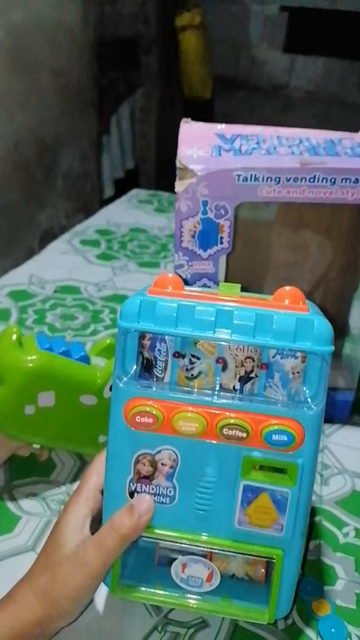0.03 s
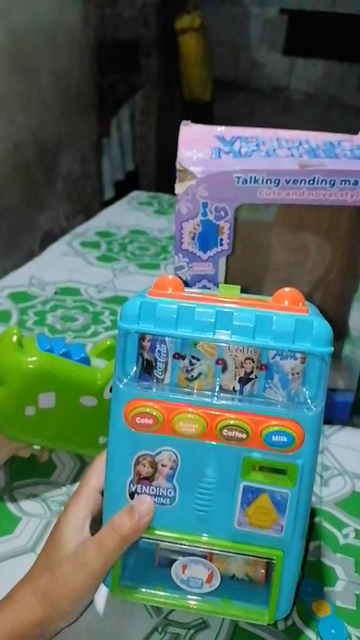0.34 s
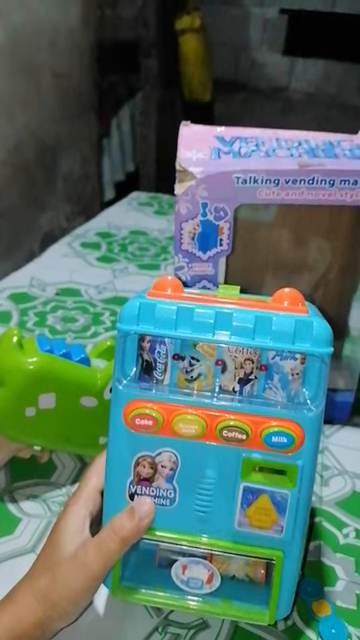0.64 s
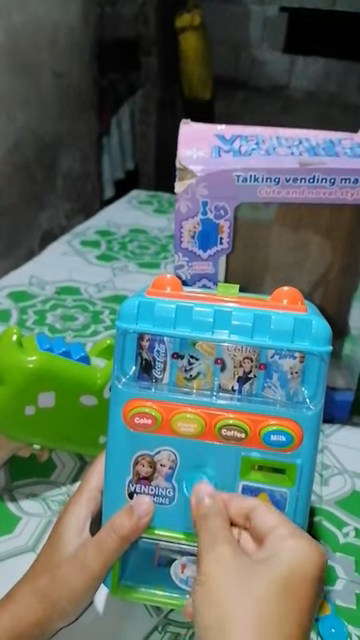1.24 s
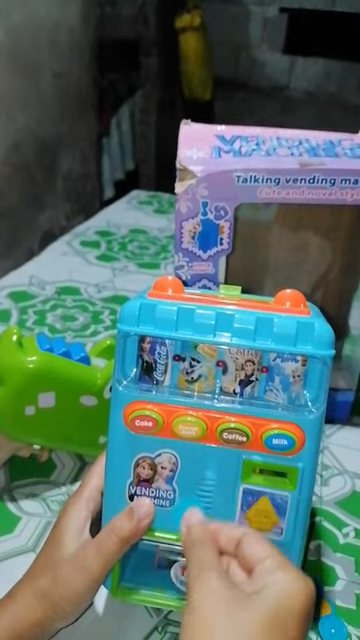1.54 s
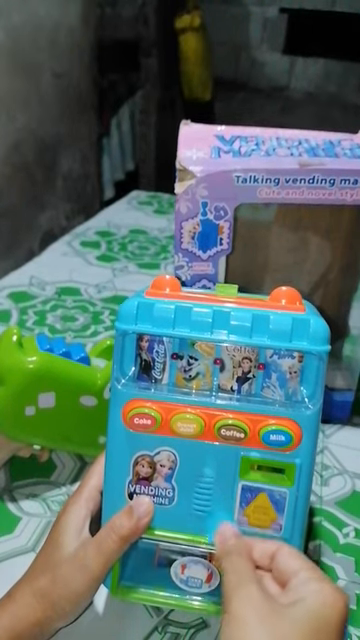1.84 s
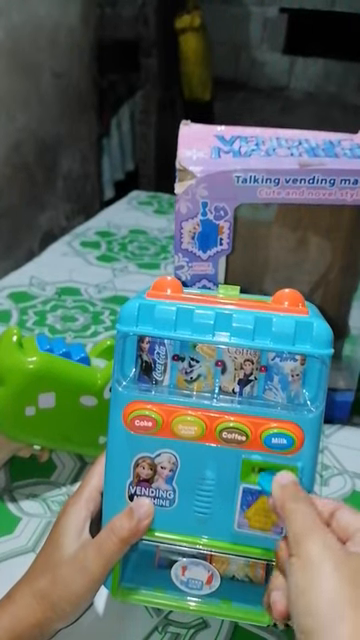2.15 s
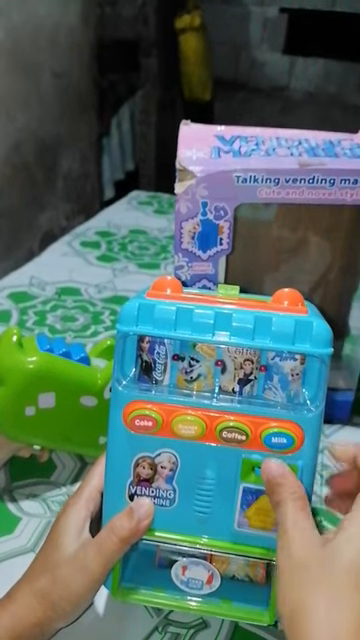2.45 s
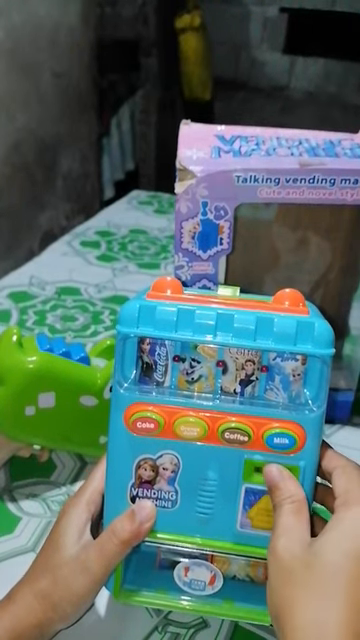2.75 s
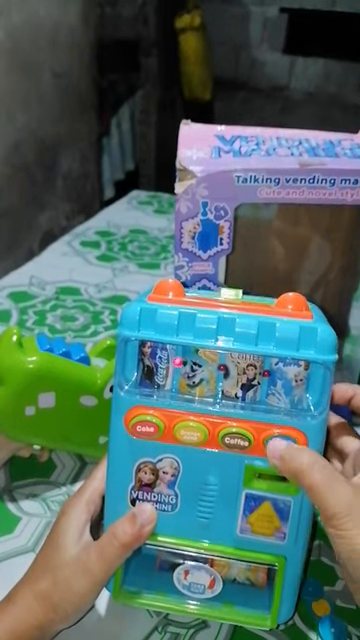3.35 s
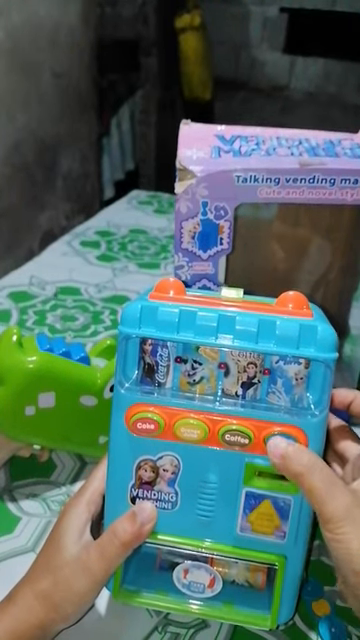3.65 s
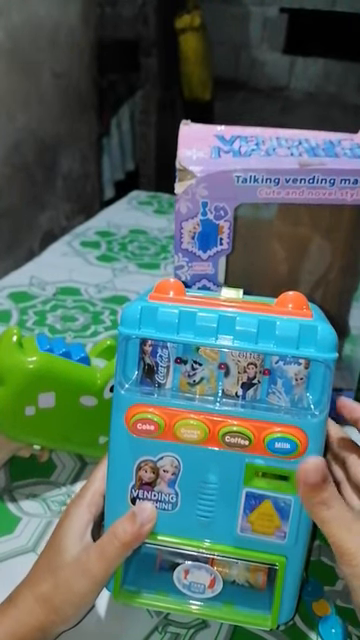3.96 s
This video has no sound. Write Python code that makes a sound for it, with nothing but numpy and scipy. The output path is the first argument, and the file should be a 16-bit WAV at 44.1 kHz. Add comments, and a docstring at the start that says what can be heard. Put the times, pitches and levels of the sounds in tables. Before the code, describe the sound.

In a quiet, hard-walled room, a hollow plastic toy machine clicks and clacks near the microphone. A token taps on it, goes in and rattles down, and a sticky button is worked, squeaking briefly twice amid faint finger rubs.

```python
"""A quiet, hard-walled room, where a plastic toy vending machine is handled on a table.
A token chatters against the front, goes through the slot and rattles down inside; a hand grips the
hollow case and works a button, which sticks and slips in two squeaks. Each contact rings the case,
panels and edges; fingers and token rub on the plastic. Faint rumble, murmur and hiss lie underneath."""
import sys
import numpy as np
from scipy import signal
from scipy.fft import rfft, irfft
from scipy.io import wavfile

SR = 44100
rng = np.random.default_rng(int(sys.argv[2]) if len(sys.argv) > 2 else 0)


def unload_wav(signal):
    """Save mono or channel-first audio to the path in sys.argv[1] as 16-bit WAV at rate SR, clipped to [-1, 1]."""
    wavfile.write(
        sys.argv[1],
        SR,
        np.round(np.clip(np.atleast_2d(signal).T, -1, 1) * 32767).astype(np.int16),
    )


N = 176400

# Token hits. Each row: start in seconds, contact time in seconds, case, panel and edge gain in dB.
TOKEN_TAPS = [(1.1442, 0.0005, -51.5, -44.5, -51.5), (1.3243, 0.0006, -54.5, -35, -31),
              (1.3398, 0.001, -53.5, -38.5, -39.5), (1.3523, 0.0012, -52, -38, -38.5),
              (1.363, 0.001, -56, -46, -48), (1.6628, 0.0006, -63, -44.5, -52),
              (1.7032, 0.0008, -57.5, -39.5, -31), (1.73, 0.0007, -65, -43.5, -36.5),
              (1.7496, 0.0008, -57.5, -43.5, -46), (1.7675, 0.0007, -59, -42.5, -45.5),
              (2.088, 0.001, -55.5, -55, -58.5), (2.103, 0.0008, -54, -47, -60.5),
              (2.8828, 0.001, -68, -50, -49.5), (2.901, 0.003, -57, -66, -53),
              (2.9222, 0.001, -63, -53, -49), (2.9492, 0.001, -89, -50, -58), (2.964, 0.002, -73, -64, -44),
              (2.9732, 0.0015, -64, -46.5, -40.5), (2.977, 0.002, -68, -46, -44),
              (2.9922, 0.002, -67, -53, -48), (3.008, 0.001, -63.5, -50, -47)]
# Slot, case and button snaps. Each row: start and contact time in seconds, case, panel, edge gain in dB.
KNOCKS = [(2.207, 0.0036, -57.5, -60.5, -56.5), (2.5447, 0.0021, -41, -38, -39),
          (2.5475, 0.0019, -40, -52.5, -40), (2.7492, 0.00088, -34, -42, -39),
          (2.751, 0.00089, -36, -34.5, -31), (2.7535, 0.0019, -40, -36.5, -34.5),
          (2.7615, 0.00082, -52, -44, -49), (2.7905, 0.00081, -72, -60, -66),
          (3.12, 0.0032, -70, -60.5, -74), (3.2005, 0.0038, -60.5, -73, -69),
          (3.3212, 0.0029, -46, -44.5, -45.5), (3.328, 0.0018, -51, -49, -57),
          (3.339, 0.0021, -37.5, -44.5, -41), (3.378, 0.003, -51.5, -52.5, -57),
          (3.4295, 0.0033, -43, -49, -51.5), (3.442, 0.0044, -52, -56, -57),
          (3.4952, 0.0031, -42.5, -46, -43.5), (3.502, 0.0021, -47, -51.5, -61),
          (3.738, 0.003, -44, -54.5, -47.5), (3.8203, 0.0028, -42, -43, -42)]
# Modes of the hollow case, the panels, and the token and small edges.
# Each row: frequency in Hz, relative level in dB, T60 in seconds.
CASE_MODES = [(275, -12.5, 0.025), (363.4, -0.5, 0.047), (437, 2.5, 0.04), (516, -2, .05),
              (693, -7.5, 0.069), (914, -5, 0.033), (1150, -15, 0.029), (1452, -9, 0.045)]
PANEL_MODES = [(1820, -9, 0.02), (2064, 0, 0.016), (2822, -2.5, 0.019), (3196, 1, 0.015),
               (4626, -4.5, 0.0074), (5276, 1.5, 0.013), (6410, -5, .01)]
EDGE_MODES = [(8610, 0, 0.013), (9100, 1, 0.0095), (9770, 1, 0.014), (10450, -8, 0.0099), (11500, -8, .012),
              (12750, -5, 0.0072), (14600, -9.5, .01)]
# Many weak modes in between. Each row: frequency in Hz, relative density in dB.
DENSE_SPECTRUM = [(120, -19.5), (300, 6), (600, 3), (1200, -1.5), (3000, 0), (4000, -3), (5500, -1.5),
                  (7500, -2.5), (9300, -1.5), (11000, -8), (16000, -6.5)]
# Range of each part. Each holds: low and high limit in Hz, dense-mode level in dB, their T60 in seconds,
# left-right likeness, left minus right in dB.
CASE_RANGE = (171.5, 1501.5, -2.5, 0.07, 0.87, -2.5)
PANEL_RANGE = (1501.5, 7200, -0.5, 0.0544, 0.36, -0.5)
EDGE_RANGE = (7201, 16499.5, -3.5, 0.16, 0.3, 0)
# Button stick-slip. Each row: start in seconds, level in dB, pitch in Hz.
SQUEAKS = [(3.3921, -31, 2990), (3.5835, -29, 2955)]
# Friction strokes. Each row: start in seconds, length in seconds, level in dB, band centre in Hz.
RUBS = [(1.157, 0.043, -58, 706), (1.234, 0.013, -59, 880), (2.209, 0.022, -57.5, 543),
        (2.241, 0.034, -60.5, 1300), (2.306, 0.016, -67.5, 1280), (2.516, 0.016, -54.5, 540),
        (3.021, 0.021, -51, 1650), (3.196, 0.057, -63.5, 597), (3.432, 0.037, -52.5, 1380)]
# Room decay. Each row: frequency in Hz, T60 in seconds (negative: the band swells).
ROOM_T60 = [(200, -0.38), (530, .5), (1400, 0.52), (3700, 0.46), (9700, 0.46), (15000, 0.39)]
# Reverberation. Each row: frequency in Hz, level against the direct sound in dB.
ROOM_LEVEL = [(200, -9.5), (500, -8), (1400, -4.5), (3000, -7), (5500, -9.5), (9500, -10.5), (15000, -16)]
# Background course. Each row: time in seconds, then rumble, murmur and hiss level in dB.
BACKGROUND_LEVELS = [(.33, -59, -63.5, -70.5), (.5, -61.5, -65, -73.5), (0.779, -60.5, -74, -80),
                     (0.858, -60, -63, -72), (1.05, -58.5, -58.5, -67.5), (1.3, -60, -65, -73),
                     (1.5, -74, -71.5, -78), (1.64, -69, -66.5, -76.5), (1.9, -79.5, -74.5, -88),
                     (1.99, -66.5, -67.5, -77.5), (2.36, -64, -71, -81), (2.46, -63, -64.5, -74),
                     (2.9, -75, -73.5, -69), (3.25, -68.5, -67.5, -80.5), (4.0, -68.5, -72, -80.5)]
# Background colours. Each row: frequency in Hz, relative density in dB.
RUMBLE_SPECTRUM = [(15, -5.5), (27, 2), (45, -10), (62, -6.5), (77, 4), (100, -7.5), (190, -8.5),
                   (300, -24), (600, -51.5)]
MURMUR_SPECTRUM = [(100, -19.5), (200, -5.5), (400, 3.5), (700, -2), (1050, 0), (1500, -13.5), (2800, -14),
                   (4000, -28), (8000, -49)]
HISS_SPECTRUM = [(1000, -20), (2800, 3), (4000, -3.5), (6200, 4), (7800, -0.5), (9300, 4.5), (11500, -7.5),
                 (16000, -12)]


def contacts(rows, size=1024, slips=12, slip_db=1, ref_contact_s=0.00071):
    """Taps and knocks: a sharp touch and a dying run of tiny slips ring case, panels and edges."""
    out = np.zeros((2, N))
    for start_s, contact_s, case_db, panel_db, edge_db in rows:
        when = np.sort(rng.uniform(0, 2, slips))  # in contact times
        slip_samples = np.clip((when * contact_s * SR).astype(int), 1, size - 1)
        force = np.zeros(size)
        force[slip_samples] = rng.standard_normal(slips) * np.exp(-when / 2)
        force = unit(force) * from_db(slip_db) * np.sqrt(contact_s / ref_contact_s)
        force[0] = 1  # first touch
        case = from_db(case_db) * ring(force, CASE_MODES, CASE_RANGE)
        panels = from_db(panel_db) * ring(force, PANEL_MODES, PANEL_RANGE)
        edges = from_db(edge_db) * ring(force, EDGE_MODES, EDGE_RANGE)
        add(out, start_s, case + panels + edges)
    return out


def ring(force, modes, part_range, size=4096):
    """A force drives one part's damped modes; their mix varies per hit and per channel."""
    low_hz, high_hz, dense_db, dense_t60_s, likeness, pan_db = part_range
    t = np.arange(size) / SR
    spread_rad = np.pi * np.sqrt(1 - likeness) / 2
    tones = 0
    for hz, db, t60_s in modes:
        phase = rng.uniform(0, 2 * np.pi) + spread_rad * rng.standard_normal((2, 1))
        detuned_hz = hz * (1 + .015 * rng.standard_normal())
        mode = np.sin(2 * np.pi * detuned_hz * t + phase) * from_db(-60 * t / t60_s)
        driven = signal.fftconvolve(mode, force[None], axes=1)[:, :size]
        tones = tones + unit(driven) * from_db(db + 2.4 * rng.standard_normal((2, 1)))
    dense = noise(DENSE_SPECTRUM, likeness, size) * from_db(-60 * t / dense_t60_s)
    dense = band(signal.fftconvolve(dense, force[None], axes=1)[:, :size], low_hz, high_hz)
    ringing = unit(band(tones, low_hz, high_hz)) + from_db(dense_db) * unit(dense)
    return unit(ringing) * pan(pan_db) * np.sqrt(SR / 100)  # energy of 10 ms at rms 1


def button_squeaks(size=1024, rise_s=0.001, octave_db=-23.5, pan_db=-8, right_lag_s=.00009):
    """A few milliseconds of stick-slip: a near sine that swells and dies."""
    out = np.zeros((2, N))
    t = np.maximum(np.arange(size) / SR - np.array([[0], [right_lag_s]]), 0)
    swell = (t / rise_s * np.exp(1 - t / rise_s)) ** 2
    for start_s, db, hz in SQUEAKS:
        phase = 2 * np.pi * hz * t
        tone = np.sin(phase) + from_db(octave_db) * np.sin(2 * phase)
        add(out, start_s, from_db(db) * swell * tone * pan(pan_db))
    return out


def rubs(half_width_oct=0.66, grain_db=4):
    """Fingers and token slide on plastic: short strokes of grainy friction noise."""
    out = np.zeros((2, N))
    t = np.arange(SR // 8) / SR
    grain_times_s = t[::64]
    for start_s, length_s, db, hz in RUBS:
        white = noise([(100, 0), (5000, 0)], likeness=0.47, size=len(t))
        roughness = np.interp(t, grain_times_s, rng.standard_normal(len(grain_times_s)))
        grains = white * from_db(grain_db * roughness)
        stroke = unit(band(grains, hz * 2 ** -half_width_oct, hz * 2 ** half_width_oct)) * np.sqrt(len(t))
        arch = np.sin(np.pi * np.minimum(t / length_s, 1))
        add(out, start_s, from_db(db) * stroke * arch)
    return out


def room(x, bands=14, gap_s=0.0052, build_s=0.0056, early_db=2, early_t60_s=0.12):
    """Early reflections from the table and the case, and a diffuse tail; the two lowest bands swell into an
    echo near 0.6 s."""
    t = np.arange(int(.6 * SR)) / SR
    onset = np.clip((t - gap_s) / build_s, 0, 1)
    limits_hz = np.geomspace(140, 17000, bands + 1)
    response = 0
    for low_hz, high_hz in zip(limits_hz, limits_hz[1:]):
        hz = np.sqrt(low_hz * high_hz)
        envelope = from_db(-60 * t / at_hz(ROOM_T60, hz)) + from_db(early_db - 60 * t / early_t60_s)
        tail = band(pair(np.exp(-hz / 900), len(t)), low_hz, high_hz) * onset * envelope
        gain = np.sqrt(2 * (high_hz - low_hz) / SR) * from_db(at_hz(ROOM_LEVEL, hz))
        response = response + unit(tail) * gain
    return signal.fftconvolve(x, response, axes=1)[:, :N]


def background(start_s=0.3255, fade_s=.005):
    """Low rumble, murmur of the air and hiss, each drifting in level."""
    t = np.arange(N) / SR
    times_s, *levels_db = np.transpose(BACKGROUND_LEVELS)
    rumble = noise(RUMBLE_SPECTRUM, likeness=0.91, size=N)
    murmur = noise(MURMUR_SPECTRUM, likeness=0.43, size=N)
    hiss = noise(HISS_SPECTRUM, likeness=0.071, size=N)
    bed = sum(from_db(np.interp(t, times_s, db)) * x for db, x in zip(levels_db, (rumble, murmur, hiss)))
    return bed * np.clip((t - start_s) / fade_s, 0, 1)


def from_db(db):
    """Decibels to gain."""
    return 10 ** (np.asarray(db) / 20)


def unit(x):
    """Scale to a mean channel energy of 1."""
    return x / np.sqrt(np.mean(np.sum(x ** 2, axis=-1)) + 1e-20)


def at_hz(points, hz):
    """Read a table on a log-frequency axis."""
    points_hz, values = np.transpose(points)
    return np.interp(np.log(np.maximum(hz, 1)), np.log(points_hz), values)


def pan(db):
    """Channel gains for a left-minus-right level."""
    gains = from_db(np.array([[db / 2], [-db / 2]]))
    return gains / np.sqrt(np.mean(gains ** 2))


def pair(likeness, size):
    """Stereo white noise; likeness is the left-right correlation."""
    mid, side = rng.standard_normal((2, size))
    return (np.sqrt(1 + likeness) * mid + np.sqrt(1 - likeness) * np.array([side, -side])) / np.sqrt(2)


def noise(spectrum, likeness, size):
    """Coloured stereo noise, rms 1."""
    gain = from_db(at_hz(spectrum, np.fft.rfftfreq(size, 1 / SR)))
    return unit(irfft(rfft(pair(likeness, size)) * gain, size)) * np.sqrt(size)


def band(x, low_hz, high_hz):
    """Causal band-pass."""
    return signal.sosfilt(signal.butter(3, [low_hz, high_hz], "band", fs=SR, output="sos"), x)


def add(out, start_s, x):
    """Mix x in at start_s."""
    i = int(start_s * SR)
    out[:, i:i + x.shape[1]] += x[:, :N - i]


def scene(contact_db=-0.5):
    """The toy close by, its room and the background."""
    toy = from_db(contact_db) * (contacts(TOKEN_TAPS) + contacts(KNOCKS)) + button_squeaks() + rubs()
    return toy + room(toy) + background()


def record(dry, cutoff_hz=15800):
    """Steep low-pass."""
    return signal.sosfilt(signal.ellip(10, .2, 70, cutoff_hz, fs=SR, output="sos"), dry)


dry = scene()
out = record(dry)
unload_wav(out)
```